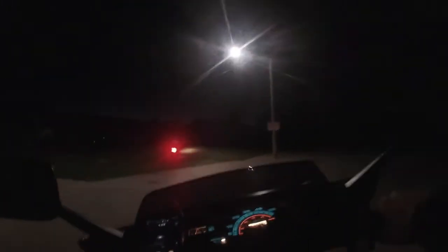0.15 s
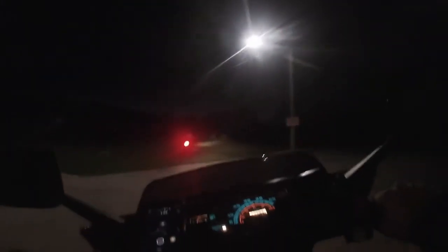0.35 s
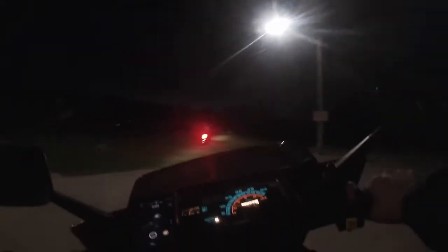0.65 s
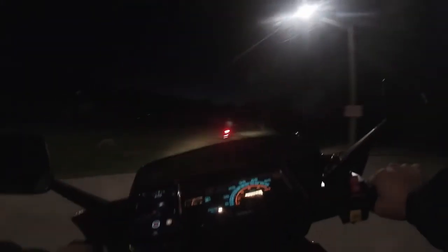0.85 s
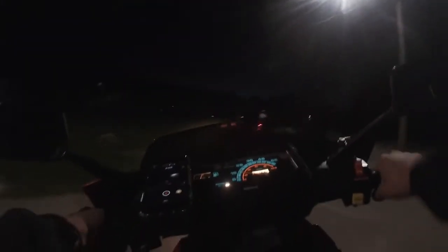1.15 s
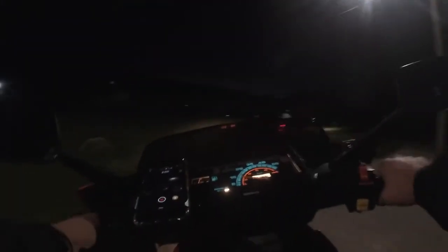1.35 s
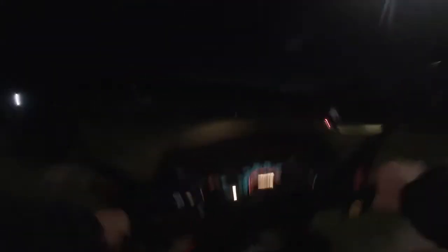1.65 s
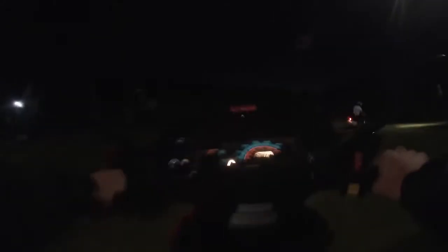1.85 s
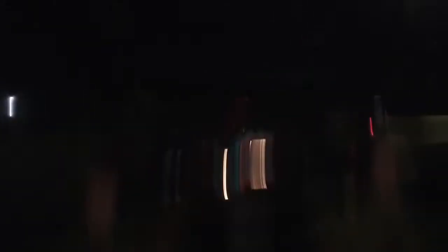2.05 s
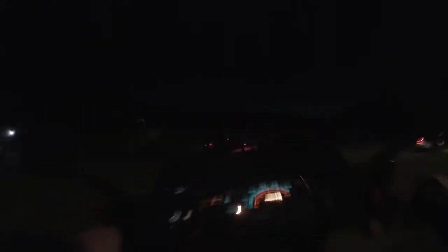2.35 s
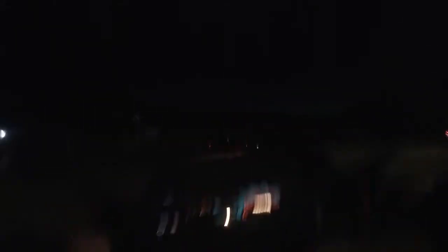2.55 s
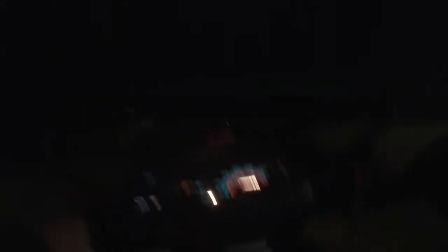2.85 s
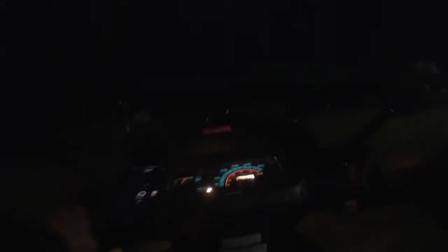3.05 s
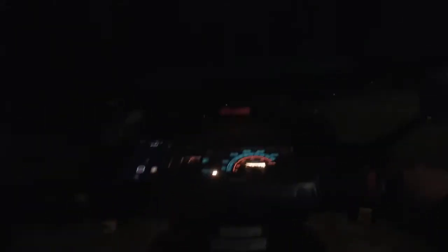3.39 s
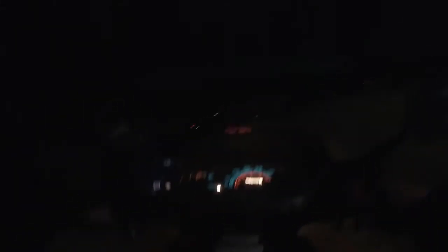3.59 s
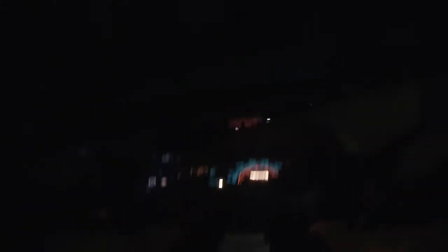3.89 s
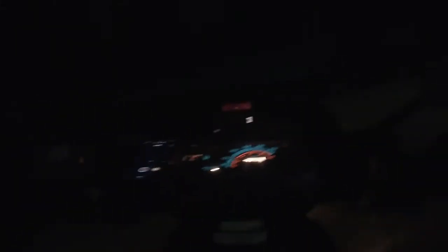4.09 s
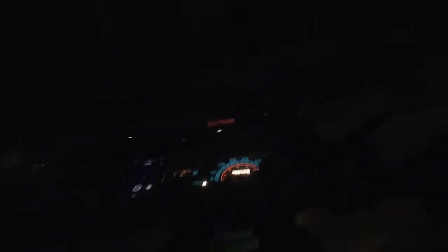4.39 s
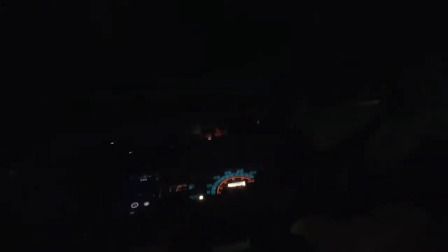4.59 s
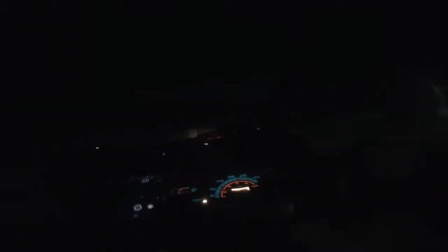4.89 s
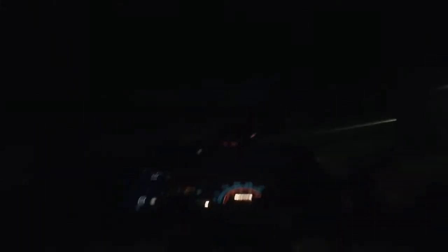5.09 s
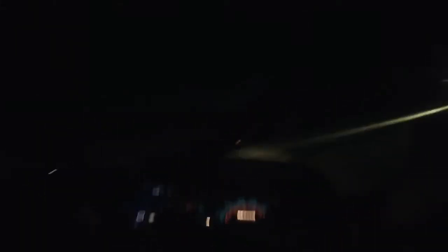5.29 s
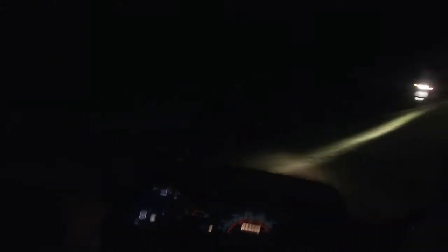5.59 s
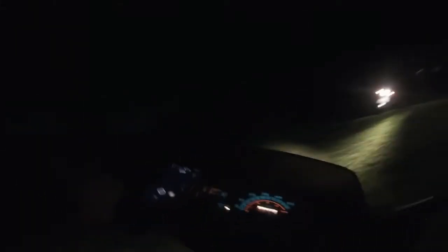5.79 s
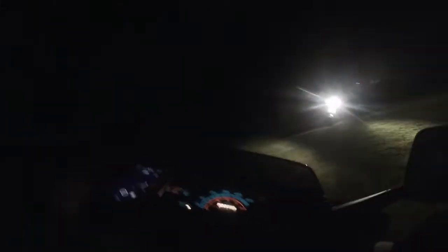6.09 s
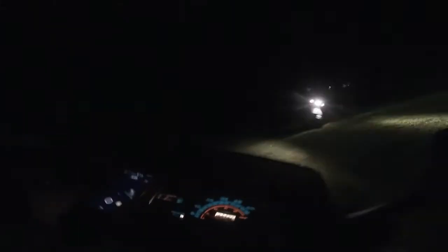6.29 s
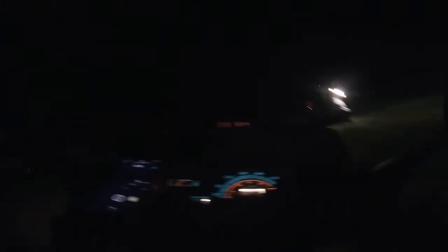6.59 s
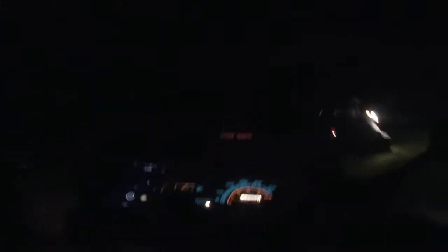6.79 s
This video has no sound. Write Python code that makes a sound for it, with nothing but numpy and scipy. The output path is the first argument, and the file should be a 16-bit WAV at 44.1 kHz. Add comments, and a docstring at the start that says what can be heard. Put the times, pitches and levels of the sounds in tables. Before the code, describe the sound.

Close on a moped at night, a low throbbing single-cylinder engine revs up with faint belt whirr. From about two seconds the ground turns rough: dull frame thumps, sharp plastic slaps and chattering panels crowd together. The rattling thins after five seconds as the engine sags, then it revs, coasts while another moped hums past briefly, and revs again. Dull small onboard microphone, outdoors, low wind buffeting.

```python
"""A single-cylinder four-stroke moped, heard from the saddle by one small microphone.
The engine revs up and down: tones locked to the firing, with noise that puffs once a firing.
The belt drive whirrs in wandering bands of noise, and low wind buffets the microphone.
On a rough stretch bumps ring the frame, and loose panels slap, chatter and buzz.
Late on, a second moped hums briefly: a few steady firing orders."""
import sys
import numpy as np
from scipy import signal
from scipy.fft import rfft, irfft
from scipy.io import wavfile
from scipy.ndimage import uniform_filter1d

SR = 44100
rng = np.random.default_rng(int(sys.argv[2]) if len(sys.argv) > 2 else 0)


def store_wav(level_fs):
    """Save 16-bit WAV to argv[1]."""
    pcm = np.round(np.clip(np.atleast_2d(level_fs), -1, 1) * 32767)
    wavfile.write(sys.argv[1], SR, pcm.T.astype(np.int16))


N = 306054

CRUISE_HZ = 33.2  # usual firing rate


def gain_of(db):
    """Decibels to an amplitude factor."""
    return 10 ** (np.asarray(db) / 20)


def evened(x):
    """Scales to rms 1."""
    return x / np.sqrt(np.mean(x ** 2) + 1e-20)


def peaked(x):
    """Scales to peak 1."""
    return x / abs(x).max()


def noise():
    """White noise as long as the scene."""
    return rng.standard_normal(N)


def smoothed(x, size):
    """Two running means over a number of samples."""
    return uniform_filter1d(uniform_filter1d(x, size), size)


def drift(seconds):
    """Slow random wander of rms 1."""
    return evened(smoothed(noise(), max(round(seconds * SR), 2)))


def curves(rows):
    """The columns of a table as signals over time."""
    s, *columns = np.transpose(rows)
    return [np.interp(np.arange(N) / SR, s, column) for column in columns]


def shaped(x, points):
    """Filters by a spectrum drawn over log frequency, down 90 dB outside its points."""
    f, db = np.transpose(points)
    hz = np.fft.rfftfreq(len(x), 1 / SR)
    gain = gain_of(np.interp(np.log(hz + 1), np.log(f), db, -90, -90))
    return irfft(rfft(x) * gain, len(x))


def coloured(x, points):
    """Filters by a spectrum, then scales to rms 1."""
    return evened(shaped(x, points))


def ring(modes, tilt_db, detune, length):
    """Modes struck once, each dying away at its own rate; the tilt is in dB per octave."""
    hz, db, t60_s = np.transpose(modes)[:, :, None]
    t = np.arange(length) / SR
    level = gain_of(db + tilt_db * np.log2(hz / hz.mean()) - 60 * t / abs(t60_s))
    return (level * np.sin(2 * np.pi * hz * detune[:, None] * t)).sum(0)


def struck(force, modes, tilt_db, detune, length):
    """A force drives a set of ringing modes."""
    return signal.oaconvolve(force, ring(modes, tilt_db, detune, length))


def add(mix, s, sound):
    """Mixes a sound in at a time."""
    part = mix[round(s * SR):][:len(sound)]
    part += sound[:len(part)]


# spectrum of the wind at the microphone: pitch_hz, level_db (per Hz)
WIND_SPECTRUM = [(10, -15), (30, -1), (50, -6), (100, -5.5), (200, -9.5), (300, -48.5)]


def wind():
    """Lumpy low buffeting at the microphone, rising with the speed of the engine."""
    level_db = -26 + 0.42 * (curves(FIRING_RATE)[0] - CRUISE_HZ)
    return gain_of(level_db + drift(0.04)) * coloured(noise(), WIND_SPECTRUM)


# passage of the second moped: time_s, firing_hz, level_db
SECOND_MOPED = [(6.17, 34.0, -50), (6.26, 34.6, -23), (6.42, 36.5, -25), (6.6, 37.0, -24), (6.7, 37.0, -50)]
# its tones: order (multiple of the firing rate), level_db
SECOND_MOPED_ORDERS = [(2, -1), (3, -12.5), (6, -7)]


def second_moped():
    """The hum of a second moped, heard while the first one coasts: firing orders that waver in level."""
    firing_hz, level_db = curves(SECOND_MOPED)
    t = np.arange(N) / SR
    turns = np.cumsum(firing_hz) / SR
    heard = (t > SECOND_MOPED[0][0]) & (t < SECOND_MOPED[-1][0])
    tones = np.zeros(N)
    for order, db in SECOND_MOPED_ORDERS:
        tones += gain_of(db + 2 * drift(0.031)) * np.sin(2 * np.pi * order * turns)
    return np.sqrt(2) * heard * gain_of(level_db) * tones


# how hard the ground shakes the frame, before the swell at each bump: time_s, level_db
GROUND = [(1.75, -24), (2.0, -19.5), (2.26, -20.5), (3.3, -17), (4.0, -14.5), (4.08, -31), (4.2, -21),
          (4.45, -13), (4.6, -33), (4.74, -16.5), (4.91, -28), (5.16, -20.5), (5.3, -20.5), (5.5, -23),
          (5.75, -30.5), (6.1, -19)]


def shake():
    """Gains of frame and panels: the ground comes in surges and is roughest around the bumps."""
    smooth_before, smooth_after = (GROUND[0][0] - .1, -70), (GROUND[-1][0] + .1, -70)
    level_db = curves([smooth_before] + list(GROUND) + [smooth_after])[0]
    surge = np.clip(drift(0.011), -2, 1.2)
    rise_s, lead_s = 0.022, 0.011  # each swell starts before its bump and peaks after it
    t = np.arange(8000) / SR
    swell = np.full(N, 0.49)  # shaking between bumps
    for s, db, _ in BUMPS:
        add(swell, s - lead_s, 0.5 * gain_of(db + 0.5) * t / rise_s * np.exp(1 - t / rise_s))
    frame_gain = swell * gain_of(level_db + 0.4 * surge)
    panel_gain = swell ** 0.43 * gain_of(level_db - 20.5 + 0.5 * surge)  # panels swell less
    return frame_gain, panel_gain


def jolts():
    """Countless small bumps shake the frame and set the panels chattering."""
    frame_gain, panel_gain = shake()
    strength = gain_of(2.1 * np.minimum(rng.exponential(1, N), 2.5))
    knocks = noise() * strength * (rng.random(N) < 900 / SR)  # about 900 a second
    frame = struck(knocks, FRAME_MODES, 0.33, np.ones(len(FRAME_MODES)), 5000)[:N]
    frame = coloured(frame, SEAT_AND_TYRES)
    some_knocks = abs(knocks) * (rng.random(N) < .3)
    chatter = noise() * abs(smoothed(some_knocks, 120))
    panel = evened(struck(chatter, PANEL_MODES, -9.5, np.ones(len(PANEL_MODES)), 2200)[:N])
    contacts = evened(np.diff(chatter, prepend=0))
    return frame_gain * frame + panel_gain * (panel + gain_of(-6.5) * contacts)


# a loose panel keeps buzzing against the frame: start_s, length_s, level_db (rms of the ring),
# brightness (dB per octave)
BUZZ_RUNS = [(2.243, 0.12, -31.5, -4), (2.352, 0.028, -33, -3), (2.401, 0.013, -39.5, -6),
             (2.449, 0.054, -34, 4), (2.523, 0.039, -33.5, -4), (2.73, 0.042, -30.5, -8),
             (2.873, 0.022, -37, 0), (2.921, 0.04, -38.5, -12.5), (3.032, 0.056, -36, -10),
             (3.069, 0.098, -34.5, -2.5), (3.198, .065, -35, -3), (3.434, 0.032, -30.5, -22),
             (3.527, 0.039, -33.5, -18.5), (3.6, 0.037, -36.5, -3), (3.661, 0.028, -33, 1),
             (3.714, 0.05, -33, -4.5), (3.852, 0.013, -35.5, -2), (3.907, 0.035, -30, -1),
             (3.978, 0.015, -40, -13.5), (4.305, 0.0084, -29, -1), (4.338, 0.058, -36, -7),
             (4.387, 0.027, -31.5, -21), (4.606, 0.022, -36, -13.5), (4.664, 0.025, -34.5, -7),
             (4.729, 0.046, -34, -5.5), (4.988, 0.017, -32, -8), (5.439, 0.043, -38.5, -15),
             (5.508, 0.022, -41, -17.5), (5.691, 0.053, -37.5, -12), (5.743, 0.024, -37, 6),
             (5.797, 0.027, -34.5, 8), (5.853, 0.014, -39, 4)]


def buzzes():
    """A dense run of uneven contacts rings the panels for a moment."""
    out = np.zeros(N)
    for s, length_s, db, tilt_db in BUZZ_RUNS:
        size = round(length_s * SR)
        touch, chance = rng.standard_normal(6000), rng.random(6000)
        contacts = (chance < 1700 / SR) * abs(touch[::-1])  # about 1700 a second
        force = touch * uniform_filter1d(contacts, size=60)
        force = force[:size] * signal.windows.tukey(size, 0.9)  # fades in and out
        detune = rng.uniform(0.927, 1.03, len(PANEL_MODES))
        panel = struck(force, PANEL_MODES, tilt_db, detune, 1500)
        add(out, s, gain_of(db) * panel / np.std(panel[:size]))
        add(out, s, gain_of(db - 8.5) * evened(np.diff(force)))  # bare contacts
    return out


# a loose panel slaps: time_s (just after first contact), level_db (peak of the ring),
# brightness (dB per octave)
SLAPS = [(0.165, -24, 12), (0.4825, -20.5, 7), (1.712, -30, 22), (2.153, -21, 17), (2.1675, -15.5, 8),
         (2.242, -22.5, 6), (2.256, -32, -3), (2.2804, -17, 2), (2.291, -19.5, 1.5), (2.318, -23, 10),
         (2.3565, -19.5, -6.5), (2.451, -10, 6), (2.4784, -18, 4.5), (2.5246, -19, -15), (2.553, -19, 7),
         (2.6305, -10, 16), (2.669, -22, -15), (2.7191, -10, 11), (2.7463, -30, -7), (2.7954, -21, -15),
         (2.8343, -19.5, -14), (2.8716, -26.5, -3.5), (2.8941, -14, 5), (3.0324, -11.5, 9),
         (3.1042, -25, 1.5), (3.131, -14.5, -9), (3.2385, -26.5, 2), (3.295, -18.5, 13), (3.349, -17, -9),
         (3.3979, -19.5, -20), (3.462, -19, 7), (3.481, -23, 6.5), (3.5052, -22, -3), (3.6823, -18.5, 0),
         (3.7106, -20, 10.5), (3.721, -16.5, -3.5), (3.748, -21.5, -8), (3.8524, -31.5, 10),
         (3.886, -30.5, -4), (3.9119, -17, 4), (3.986, -23.5, -1), (4.14, -23, -10), (4.3025, -29, -13),
         (4.3521, -19, -5), (4.394, -24.5, 8), (4.4577, -26, -4), (4.5374, -20.5, -2), (4.695, -20, 0),
         (4.727, -21, -1), (4.786, -27, 1), (4.9798, -16, 1.5), (5.0102, -21.5, 5.5), (5.031, -20, 6),
         (5.0791, -18.5, -5), (5.1412, -24, 10), (5.1784, -21.5, 5), (5.204, -23.5, -3.5),
         (5.2602, -23.5, 10), (5.269, -22, -0.5), (5.3415, -27.5, 0), (5.3846, -24, -10),
         (5.4023, -18.5, -12), (5.452, -27.5, -0.5), (5.467, -23.5, 8), (5.49, -22.5, -13),
         (5.519, -32.5, 13), (5.55, -32.5, 9), (5.604, -27.5, 2), (5.7395, -21, -1), (5.757, -25.5, -13),
         (5.8075, -26, 2), (5.848, -26.5, -1), (5.887, -33, -6), (5.9835, -23.5, 21.5)]
# modes of the loose panels: pitch_hz, level_db, t60_s
PANEL_MODES = [(1042, -7, 0.034), (1723, 5, 0.012), (2345, 11, 0.0036), (3448, 1.5, 0.0046),
               (4300, -15, 0.0049), (6200, -18.5, 0.0022)]


def rattles():
    """Each slap is a burst of tiny contacts with a rebound tail, heard as a crack and a panel ring."""
    out, t = np.zeros(N), np.arange(3000) / SR
    lead_s = .0018  # the contacts begin this long before the listed time
    burst = (t / .0014) ** 2 * np.exp(-t / .0014)
    rebounds = .11 * np.exp(-t / .012) * (t > lead_s)
    fade = burst + rebounds
    for s, db, tilt_db in SLAPS:
        force = rng.standard_normal(len(t)) * fade
        detune = rng.uniform(.95, 1.05, len(PANEL_MODES))
        panel = struck(force, PANEL_MODES, max(tilt_db, -8), detune, 1500)
        add(out, s - lead_s, gain_of(db) * peaked(panel))
        crack = peaked(np.diff(force * fade ** 0.8))  # shorter, and thin in the bass
        crack_db = db - 4 + .4 * min(tilt_db, 6)  # stronger in a bright slap
        add(out, s - lead_s, gain_of(crack_db) * crack)
    return out


# the frame takes a bump: time_s (just after the force begins), level_db (peak before the seat and
# tyres dull it), pitch_hz (sets the lean towards higher or lower modes)
BUMPS = [(1.984, -9.5, 452), (2.019, -16.5, 387), (2.15, -3.5, 432), (2.254, -9, 377), (2.312, -8, 427),
         (2.43, -6, 428), (2.485, -7, 500), (2.549, -1, 222), (2.589, -8, 179), (2.623, 1, 211),
         (2.751, -4.5, 273), (2.808, -5, 205), (2.875, -6.5, 428), (2.911, -4.5, 184), (2.958, -6, 223),
         (3.001, -7, 216), (3.068, -5.5, 218), (3.117, -5.5, 194), (3.217, -6, 438), (3.305, -3, 216),
         (3.4, -19.5, 184), (3.455, -5, 424), (3.668, -6.5, 436), (3.741, -7, 388), (3.793, -11, 437),
         (3.838, -17, 181), (3.913, -2, 176), (3.982, -3.5, 203), (4.143, -9.5, 215), (4.169, -8.5, 402),
         (4.3, -11.5, 453), (4.395, -3.5, 232), (4.444, -5, 210), (4.604, -7, 195), (4.722, -6, 226),
         (4.757, -2.5, 220), (4.998, -4.5, 245), (5.065, -7, 195), (5.126, -4, 207), (5.145, -9.5, 234)]
# modes of the frame: pitch_hz, level_db, t60_s
FRAME_MODES = [(142, -20, 0.03), (194, -7, 0.28), (222.6, 9.5, 0.072), (306, 4, 0.047), (397.2, 0, 0.084),
               (435, 1.5, 0.082), (526, -21, 0.078)]
# seat and tyres swallow the top of a bump: pitch_hz, level_db
SEAT_AND_TYRES = [(5, -24), (600, 3), (720, -5.5), (1500, -11.5), (22050, -55)]


def thumps():
    """Each bump is a short, blunt shudder of force that rings the frame."""
    out, t = np.zeros(N), np.arange(1500) / SR
    for s, db, pitch_hz in BUMPS:
        tilt_db = 20.5 * np.log2(pitch_hz / 278)  # a higher bump leans on the higher modes
        shudder = uniform_filter1d(rng.standard_normal(len(t)), size=12)
        force = shudder * (t / .004) ** 2 * np.exp(-t / .004)
        detune = rng.uniform(1.0, 1.03, len(FRAME_MODES))
        sound = struck(force, FRAME_MODES, tilt_db, detune, 5000)
        add(out, s - .003, gain_of(db) * peaked(sound))
    return shaped(out, SEAT_AND_TYRES)


# resonances of the drive cover: pitch_hz, level_db
COVER_RESONANCES = [(2130, -3), (2800, 1.5), (3500, -6), (1770, -9.5)]
# loudness of the whirr: time_s, level_db
WHIRR_LEVEL = [(0, -53), (.15, -35.5), (.3, -45), (.5, -42), (.65, -52.5), (1.5, -63), (6.4, -57.5),
               (6.65, -47), (6.85, -45), (6.94, -56)]


def whirr():
    """Noise of the belt drive in narrow resonances that wander, swell and fade each on its own."""
    pole = np.exp(-np.pi * 420 / SR)  # 420 Hz wide for each of two passes
    out = np.zeros(N)
    for hz, db in COVER_RESONANCES:
        wandering_hz = hz * (1 + 0.025 * drift(0.092))
        carrier = np.exp(2j * np.pi * np.cumsum(wandering_hz) / SR)
        band = noise() / carrier  # shifted down, low-passed twice, shifted back up
        for _ in range(2):
            band = signal.lfilter([1 - pole], [1, -pole], band)
        out += gain_of(db + 2.2 * drift(.025)) * evened((carrier * band).real)
    return gain_of(curves(WHIRR_LEVEL)[0]) * evened(out)


def boom_db(hz):
    """Lift that the exhaust gives a tone as it passes the boom near 104 Hz."""
    return 9.5 * np.exp(-(np.log2(hz / 104) / 0.27) ** 2)


# firing rate of the engine: time_s, firing_hz
FIRING_RATE = [(0.0, 27.5), (0.17, 29.5), (0.35, 30.3), (0.54, 36.2), (0.7, 36.8), (1.02, 36.9),
               (1.22, 40.0), (1.32, 41.2), (1.48, 35.8), (1.61, 34.2), (1.75, 32.6), (1.97, 37.8),
               (2.14, 39.2), (2.23, 46.0), (2.32, 37.8), (2.72, 39.6), (2.92, 33.5), (3.25, 29.8),
               (3.5, 29.2), (3.7, 34.5), (4.09, 33.7), (4.85, 27.2), (5.72, 17.9), (5.83, 25.0),
               (5.9, 30.6), (5.97, 34.5), (6.1, 39.0), (6.2, 36.0), (6.38, 28.2), (6.56, 26.5),
               (6.64, 29.6), (6.76, 37.8), (6.87, 42.0), (6.94, 43.0)]
# crank tone, loud on the throttle and faint when coasting: time_s, level_db
CRANK_LEVEL = [(0.0, -43.5), (0.12, -25), (0.35, -26), (0.54, -14.5), (0.75, -21), (1.0, -17.5),
               (1.08, -16), (1.22, -13), (1.3, -15.5), (1.4, -16.5), (1.6, -25.5), (1.97, -17),
               (2.12, -15.5), (2.22, -26.5), (2.29, -28.5), (2.5, -19), (2.7, -18), (2.78, -35),
               (3.47, -37), (3.6, -18), (3.72, -22), (3.94, -26.5), (4.6, -21), (5.4, -41), (5.72, -29),
               (5.82, -22), (5.92, -14.5), (6.08, -15.5), (6.15, -16.5), (6.21, -27.5), (6.36, -27),
               (6.58, -24.5), (6.64, -18.5), (6.72, -17.5), (6.94, -12.5)]
# third and fourth firing order against the crank tone: time_s, third_db, fourth_db
THIRD_AND_FOURTH = [(0.3, -8, -7), (0.5, -5, -13), (0.9, -5, -8), (1.3, -11, -15), (1.5, -5, -2),
                    (1.8, -8, -12), (2.1, -5, -14), (2.4, -18, -12), (4.6, -10, -5), (5.78, 2, 6),
                    (5.92, -4, -4), (6.1, -11, -12), (6.65, -1, 1), (6.8, -9, -13)]
# other firing orders against the crank tone, before load and boom: order, level_db
OTHER_ORDERS_LEVEL = [(1, -22.5), (5, -21), (6, -14), (9, -18), (10, -18)]


def firing_tones(firing_hz, crank_db, turns):
    """Tones at multiples of the firing rate; the second, the crank tone, is one cycle a crank turn."""
    gaining_hz_s = uniform_filter1d(np.gradient(firing_hz) * SR, size=2000)
    # the other orders swell as the engine gains speed, and stand out when it is slow
    load_db = crank_db + 0.0535 * gaining_hz_s - 0.51 * (firing_hz - CRUISE_HZ)
    third_db, fourth_db = curves(THIRD_AND_FOURTH)
    phase = 2 * np.pi * turns
    tones = gain_of(crank_db + .6 * drift(.03)) * np.sin(2 * phase)
    tones += gain_of(crank_db + third_db + drift(.04)) * np.sin(3 * phase + 1.3)
    tones += gain_of(crank_db + fourth_db + 1.5 * drift(.04)) * np.sin(4 * phase + 3.4)
    for order, db in OTHER_ORDERS_LEVEL:  # each order wavers in level and phase
        level_db = load_db + db + boom_db(order * firing_hz) + 2 * drift(0.091)
        tones += gain_of(level_db) * np.sin(order * phase + 0.88 * order + 0.46 * drift(0.025))
    return np.sqrt(2) * tones


# ring of the valve tick: pitch_hz, level_db, t60_s
VALVE_MODES = [(6880, -0.5, 0.026), (4900, -3.5, 0.011), (1586, 9, 0.02)]


def valve_ticks(firing_hz, turns):
    """An uneven tick each crank turn, two a firing, clearest at low speed."""
    ticks = np.diff(np.floor(2 * turns), prepend=0) * gain_of(2 * noise())
    valve = struck(ticks, VALVE_MODES, 0, np.ones(len(VALVE_MODES)), 800)[:N]
    return gain_of(-41.5 - 1.2 * (firing_hz - 14.5)) * evened(valve)


# engine noise through the ride: time_s, roar_db (exhaust and drive), clatter_db
RIDE_LEVELS = [(0.0, -20, -35.5), (0.44, -19, -33.5), (0.79, -21.5, -36.5), (1.25, -21.5, -36.5),
               (1.51, -22, -41), (1.8, -27.5, -37.5), (2.01, -29, -34), (2.2, -19, -36.5), (2.94, -20, -35),
               (3.32, -18.5, -40), (3.75, -23.5, -37), (4.14, -22, -40), (4.52, -21, -38.5),
               (5.04, -21, -39), (5.45, -28.5, -42.5), (5.91, -20.5, -36), (6.22, -28, -42),
               (6.47, -27.5, -42), (6.73, -24, -36), (6.94, -19.5, -39)]
# spectrum of the exhaust and drive roar: pitch_hz, level_db (per Hz)
ROAR_SPECTRUM = [(60, -27), (100, -3.5), (150, -3.5), (220, -4), (320, -3.5), (420, -6), (560, -12),
                 (680, -22.5), (1200, -37), (2000, -83.5)]
# spectrum of the engine clatter: pitch_hz, level_db (per Hz)
CLATTER_SPECTRUM = [(500, -7.5), (700, 1), (900, -2), (1270, -2.5), (1700, -2.5), (2200, -5.5),
                    (3000, -12.5), (3730, -11.5), (4600, -18), (5550, -18), (6200, -19.5), (8000, -21),
                    (15500, -15)]
# spectrum of the whine under load: pitch_hz, level_db (per Hz)
WHINE_SPECTRUM = [(1600, -28), (2200, -11), (2900, -2), (3730, -7.5), (4200, -9), (5200, -27.5),
                  (5550, -7.5), (5800, -24)]


def engine():
    """Firing tones and valve ticks, with roar, clatter and a whine under load that puff once a firing."""
    firing_hz, crank_db = curves(FIRING_RATE) + curves(CRANK_LEVEL)
    roar_db, clatter_db = curves(RIDE_LEVELS)
    turns = np.cumsum(firing_hz * (1 + .004 * drift(.03))) / SR  # firings so far
    puff = np.exp(-(turns % 1) / 0.23)
    strength = gain_of(11.7 * np.minimum(rng.standard_normal(400), 1.4))[turns.astype(int)]  # per firing
    roar = (3.2 + strength * puff) * gain_of(0.24 * drift(0.016)) * noise()
    clatter = (1 + .5 * puff) * gain_of(drift(.006) + 1.1 * drift(.03)) * noise()
    whine = (1 + puff) * noise()
    whine_db = clatter_db - 8.5 + 1.5 * (crank_db + 16)
    out = firing_tones(firing_hz, crank_db, turns) + valve_ticks(firing_hz, turns)
    out += gain_of(roar_db) * coloured(roar, ROAR_SPECTRUM)
    out += gain_of(clatter_db) * coloured(clatter, CLATTER_SPECTRUM)
    return out + gain_of(whine_db) * coloured(whine, WHINE_SPECTRUM)


def scene():
    """Everything reaches one microphone on the moped."""
    background = wind() + second_moped()
    rough_road = jolts() + buzzes() + rattles() + thumps()
    return (background + rough_road + whirr() + engine())[None]


# response of the microphone in its housing: pitch_hz, level_db
MICROPHONE_RESPONSE = [(8, -25), (28, -1), (5800, -1), (6600, -8.5), (7100, -15), (8000, -18.5),
                       (9200, -15.5), (9900, -23), (10450, -21.5), (11100, -32), (12200, -27.5),
                       (13200, -35.5), (14200, -35), (22050, -33.5)]


def record(dry):
    """Soft overload of the small microphone, its dull treble, then a band limit at 15.1 kHz."""
    running = np.pad(dry[0], (2000, 2006), "reflect")  # keeps the filters off the ends
    heard = shaped(0.92 * np.tanh(running / 0.88), MICROPHONE_RESPONSE)[None]
    band_limit = signal.firwin(511, 15100, window=("kaiser", 9), fs=SR)[None]
    return signal.oaconvolve(heard, band_limit, "same")[:, 2000:-2006]


dry = scene()
out = record(dry)
store_wav(out)
```